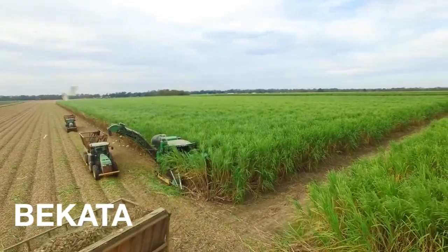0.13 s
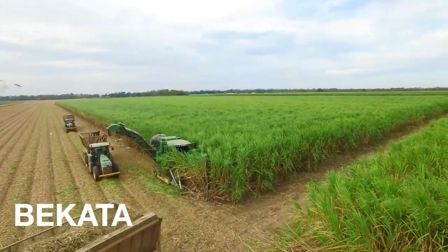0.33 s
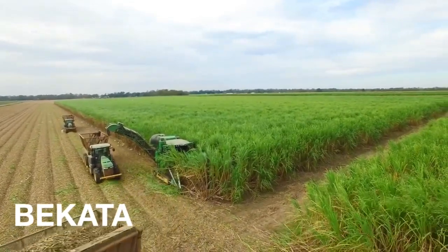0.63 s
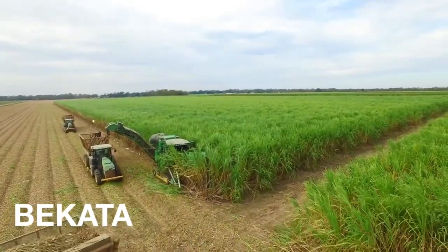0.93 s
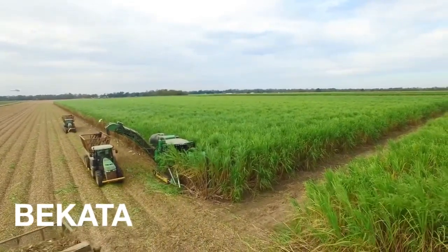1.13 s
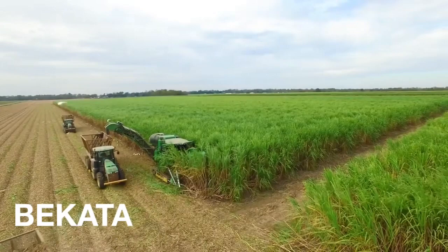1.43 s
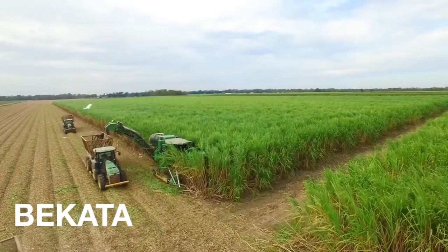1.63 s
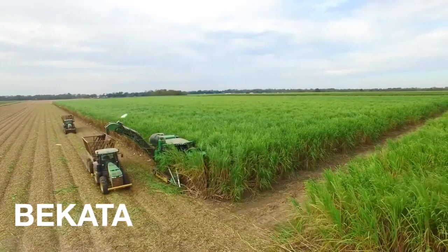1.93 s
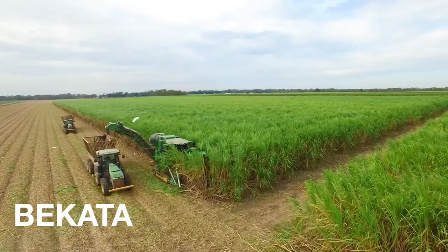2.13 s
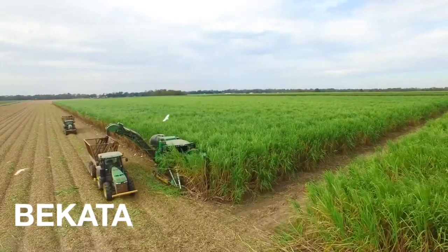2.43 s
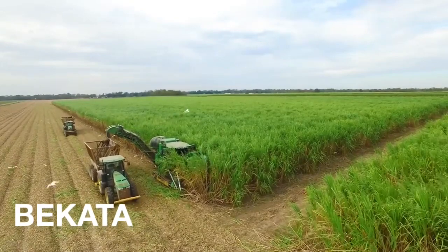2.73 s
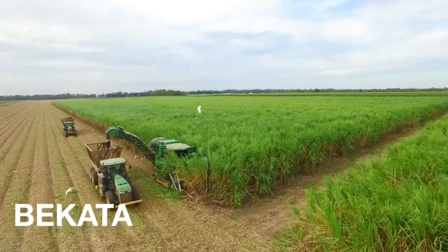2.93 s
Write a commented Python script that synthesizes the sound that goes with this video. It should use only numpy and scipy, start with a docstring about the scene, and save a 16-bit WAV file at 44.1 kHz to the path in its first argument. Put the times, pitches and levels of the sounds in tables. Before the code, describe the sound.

Harvesting machinery roars briefly up close, then rumbles in the distance under gusty wind.

```python
"""A cane harvester and tractors work in an open field on a windy day. First comes a close, bright roar of
machinery; after a quarter second the scene changes. Then distant engines rumble and hum, and wind rushes
through the cane. Fans whirr, chopped stalks rattle faintly, cutters rasp at each bite and gusts buffet the
microphone. The breeze peaks just after two seconds, then eases."""
import sys
import numpy as np
from scipy import signal
from scipy.fft import rfft, irfft, next_fast_len
from scipy.io import wavfile
from scipy.ndimage import uniform_filter1d, map_coordinates

SR = 44100
rng = np.random.default_rng(int(sys.argv[2]) if len(sys.argv) > 2 else 0)


def store_pcm(level_fs):
    """Save levels as 16-bit WAV."""
    pcm = np.round(np.clip(level_fs, -1, 1) * 32767).astype(np.int16)
    wavfile.write(sys.argv[1], SR, np.atleast_2d(pcm).T)


N = 136269
T = np.arange(N) / SR

# The breeze that rides the cane, rattle and fans. Each row: time in seconds, strength in dB.
BREEZE = [(.25, -5.5), (.45, -2), (.8, -0.3), (1.1, -0.5), (1.35, 1.5), (1.75, 1.5), (2.15, 3), (2.5, -0.4),
          (2.8, -0.5), (3.09, -0.5)]


def close_machinery(level_db=-27, tone_width_hz=24):
    """Machinery up close: a rough, broad roar with tones ringing in it."""
    # The roar's colour. Each row: frequency in Hz, relative level in dB.
    spectrum = [(21, -35), (35, -1), (113, 1.5), (150, -6.5), (188, 1), (231, -11), (283, -10.5),
                (460, -18.5), (522, -9), (938, -14), (1040, -8.5), (1210, -13.5), (1410, -11),
                (2290, -17.5), (2670, -21.5), (3440, -20), (4920, -25), (8190, -25), (15500, -38)]
    # Its ringing tones. Each row: pitch in Hz, level in dB before the gain ride.
    ringing = [(112, -35.5), (195, -36.5), (684, -41.5), (1050, -51.5), (1107, -63), (1432, -55),
               (1927, -50.5), (2062, -44.5), (2369, -46.5)]
    # The gain ride on both. Each row: time in seconds, gain in dB.
    ride = [(0, 1.5), (.06, 0), (.1, 1), (.14, 0), (.24, -0.5)]
    roar = from_db(level_db + drift(40)) * coloured(spectrum)
    tones = sum(from_db(db) * evened(resonant(hz, tone_width_hz), 0.27) for hz, db in ringing)
    return from_db(in_time(ride)) * ground_echo(roar + tones)


def distant_engines(firing_hz=110.5, firing_db=-44.5, hum_hz=444.6):
    """Far engines: exhaust rumble, a firing tone, a thin wavering hum and faint whines."""
    # The rumble's colour. Each row: frequency in Hz, relative level in dB.
    spectrum = [(25, -14), (45, -6), (90, -1.5), (160, 1.5), (265, -5.5), (310, -24), (420, -15),
                (520, -28), (900, -71)]
    # The rumble swells gently. Each row: time in seconds, level in dB.
    rumble_ride = [(.25, -38.5), (1.0, -37.5), (1.9, -35), (2.5, -37), (3.09, -36)]
    # The hum comes and goes. Each row: time in seconds, level in dB.
    hum_ride = [(.29, -67), (.38, -55.5), (.55, -51.5), (.64, -67), (.75, -53.5), (1.1, -60.5),
                (1.4, -50.5), (1.6, -56.5), (1.88, -55), (1.98, -69), (2.08, -57), (2.2, -59.5),
                (2.42, -54), (2.72, -66), (2.86, -56.5), (3.09, -58.5)]
    # Thin whines of the harvester's drives. Each row: pitch in Hz, level in dB.
    drives = [(1157, -73), (2060, -53), (2250, -57), (3712, -63), (4581, -65.5), (5855, -73), (6588, -106)]
    rumble = from_db(in_time(rumble_ride)) * evened(coloured(spectrum), 0.51)
    firing = from_db(firing_db) * rms_one(np.sin(turning(firing_hz, wander=0.0295)))
    hum = from_db(in_time(hum_ride)) * evened(resonant(hum_hz, width_hz=9), 0.048)
    whines = sum(from_db(db) * resonant(hz, width_hz=9.1) for hz, db in drives)
    return rumble + firing + hum + whines


def microphone_wind(bed_db=-34.8, knock_hz=317, even_s=0.018):
    """Wind on the microphone: steady low turbulence, a thump per gust, a knock on the hardest."""
    # The steady turbulence. Each row: frequency in Hz, relative level in dB.
    spectrum = [(20, -59), (32, -30), (45, -5), (65, 0.5), (100, -8), (150, -12), (250, -20.5), (330, -62),
                (600, -47), (1500, -88)]
    # The gusts. Each row: peak time and half length in seconds, level in dB, centre in Hz.
    gusts = [(0.497, 0.0051, -18.5, 72.6), (0.52, 0.0091, -23, 71), (0.622, 0.037, -29, 87),
             (0.816, 0.031, -26.5, 64.6), (0.901, 0.024, -24.5, 67), (1, 0.055, -30, 45.5),
             (1.079, 0.0077, -18, 70), (1.209, 0.018, -28, 88), (1.322, 0.011, -22, 45.6),
             (1.438, 0.02, -29.5, 72), (1.587, 0.054, -27.5, 59), (1.703, 0.054, -31.5, 71),
             (1.9, 0.029, -27.5, 87), (2.096, 0.032, -30, 73.4), (2.387, 0.0075, -16.5, 96),
             (2.414, 0.016, -20, 84), (2.545, 0.013, -20, 74), (2.585, 0.014, -23, 88),
             (2.641, 0.021, -22, 97), (2.9, 0.061, -29, 68)]
    strength = sum(from_db(db) * swell(at, half) for at, half, db, _ in gusts)
    thumps = sum(from_db(db) * burst(at, half, gust(hz, even_s)) for at, half, db, hz in gusts)
    knocks = from_db(-4) * strength ** 2 * evened(resonant(knock_hz, width_hz=59), even_s)
    bed = from_db(bed_db) * evened(coloured(spectrum), even_s)
    return bed + thumps + knocks


def gust(centre_hz, even_s, relative_width=0.65, low_hz=34.7, top_hz=197):
    """Dull turbulence around one low pitch, of even level."""
    def band(hz):
        peak = 1 / (1 + ((hz / centre_hz - 1) / relative_width) ** 2)
        return peak / (1 + (low_hz / hz) ** 6 + (hz / top_hz) ** 4)
    return rms_one(evened(shaped(band), even_s))


def wind_in_cane(rush_db=-41.5, hiss_db=-41, rush_follows=0.31):
    """The breeze lifts a low rush, a brighter hiss and ticking leaves; single flicks stand out."""
    # The low rush. Each row: frequency in Hz, relative level in dB.
    rush_spectrum = [(300, -12), (530, -13), (680, -5), (760, -5.5), (880, -2.5), (1100, -0.5),
                     (1350, -2.5), (1850, -6.5), (2080, -13.5), (2600, -9.5), (4000, -48), (8000, -39.5)]
    # The hiss of the leaves. Each row: frequency in Hz, relative level in dB.
    hiss_spectrum = [(700, -8.5), (1400, 1.5), (2200, 2), (3300, -3), (4200, -9.5), (4900, -12),
                     (5600, -12.5), (7400, -12.5), (8700, -17.5), (9800, -18), (10400, -27), (12200, -28),
                     (15500, -55)]
    # Leaf flicks. Each row: peak time and half length in seconds, pitch and width in Hz, level in dB.
    leaves = [(0.402, 0.002, 4040, 150, -41.5), (1.593, 0.0028, 4050, 250, -51),
              (1.73, .004, 7200, 550, -55), (2.122, 0.0037, 7400, 550, -48), (2.73, .0015, 3800, 300, -47),
              (2.743, .0016, 7900, 700, -48), (2.752, .0019, 3680, 260, -44),
              (2.962, .0019, 8200, 480, -43.5)]
    breeze_db = in_time(BREEZE)
    rush = from_db(rush_db + rush_follows * breeze_db + 0.8 * drift(32)) * coloured(rush_spectrum)
    hiss = from_db(hiss_db + breeze_db + drift(7.6)) * coloured(hiss_spectrum)
    flicks = sum(from_db(db) * burst(at, half, resonant(hz, width))
                 for at, half, hz, width, db in leaves)
    return rush + hiss + flicks + leaf_ticks(breeze_db)


def cutters(rasp_hz=2890, width_hz=990, roughness_db=3):
    """The cutters give a rough rasp that surges as they bite into thicker cane."""
    # The bites. Each row: peak time and half length in seconds, level in dB.
    bites = [(0.425, 0.028, -58), (.83, 0.034, -47), (1.196, .025, -47), (1.327, 0.015, -42),
             (1.57, 0.1, -43.5), (1.786, 0.034, -41), (2.135, 0.017, -43), (2.342, 0.025, -44.5),
             (2.9, .022, -49)]
    load = sum(from_db(db) * swell(at, half) for at, half, db in bites)
    return load * rms_one(from_db(roughness_db * drift(90)) * resonant(rasp_hz, width_hz))


def fans(width_hz=54, breeze_follows=0.74):
    """The harvester's fans whirr in narrow, wavering resonances, carried in on the breeze."""
    # The resonances. Each row: pitch in Hz, level in dB before the breeze lifts or lowers it.
    resonances = [(900, -54), (1085, -49.5), (1420, -54), (2080, -50), (2290, -55.5)]
    whirr = 0
    for hz, db in resonances:
        phase = turning(hz, wander=0.04)
        band = drift(width_hz) * np.cos(phase) + drift(width_hz) * np.sin(phase)
        whirr = whirr + from_db(db) * rms_one(band)
    return from_db(breeze_follows * in_time(BREEZE)) * whirr


def stalk_rattle(knocks_per_s=110, level_db=-48, width_hz=39, panels=60):
    """Chopped stalks knock about in the harvester, each ringing one of many panel resonances."""
    hits = rng.random(N) < knocks_per_s / SR
    knocks = hits * rng.uniform(0.45, 1, N) * from_db(in_time(BREEZE))
    panel_hit = rng.integers(0, panels, N)
    radius = np.exp(-np.pi * width_hz / SR)
    rattle = 0
    for panel, hz in enumerate(np.geomspace(830, 4700, panels)):
        ring = rung(knocks * (panel_hit == panel), hz, radius, passes=2)  # blurred by distance
        rattle = rattle + ring / (1 + (hz / 2300) ** 2)
    return from_db(level_db) * rms_one(rattle)


def leaf_ticks(breeze_db, base_ticks_per_s=550, level_db=-54, ring_cycles=33, pitches=16):
    """Leaves touch at random, more often in a stronger breeze; each touch rings briefly."""
    touches = rng.random(N) < base_ticks_per_s * from_db(breeze_db + 3 * drift(8)) / SR
    strength = from_db(-5 * np.minimum(rng.exponential(1, N), 4))
    clicks = touches * strength * rng.choice([-1, 1], N)
    pitch_hit = rng.integers(0, pitches, N)
    ticks = 0
    for pitch, hz in enumerate(np.geomspace(3000, 9300, pitches)):
        radius = from_db(-60 * hz / (ring_cycles * SR))
        ticks = ticks + hz ** -0.8 * rung(clicks * (pitch_hit == pitch), hz, radius)
    return from_db(level_db) * rms_one(ticks)


def ground_echo(x, delay_s=0.0062, wander_s=0.000633, gain=0.11):
    """The sound also arrives off the ground, by a path that wavers in the wind."""
    lag_s = delay_s + wander_s * drift(1.0)
    return x + gain * map_coordinates(x, [(T - lag_s) * SR], order=3, mode="reflect")


def from_db(db):
    """Decibels to gain."""
    return 10 ** (np.asarray(db) / 20)


def rms_one(x):
    """Scale to unit rms."""
    return x / np.sqrt(np.mean(x ** 2) + 1e-20)


def in_time(rows):
    """Join (seconds, value) rows by straight lines."""
    return np.interp(T, *np.transpose(rows))


def shaped(gain_at):
    """Noise whose amplitude spectrum is the given function of frequency; rms 1."""
    size = next_fast_len(N, True)
    hz = np.maximum(np.arange(size // 2 + 1) * SR / size, 1)
    return rms_one(irfft(rfft(rng.standard_normal(size)) * gain_at(hz), size)[:N])


def coloured(spectrum):
    """Noise drawn through (Hz, dB) points, rolled off below the first; rms 1."""
    points_hz, db = np.transpose(spectrum)

    def gain_at(hz):
        curve = from_db(np.interp(np.log(hz), np.log(points_hz), db))
        return curve / np.sqrt(1 + (points_hz[0] / hz) ** 8)
    return shaped(gain_at)


def resonant(centre_hz, width_hz):
    """A band of noise, 6 dB down at width_hz either side of its centre."""
    return shaped(lambda hz: 1 / (1 + ((hz - centre_hz) / width_hz) ** 2))


def drift(rate_hz):
    """Smooth random movement; rms 1."""
    return resonant(0, rate_hz)


def evened(x, seconds):
    """Tame the slow swings in a noise's level."""
    size = max(int(seconds * SR), 2)
    power = uniform_filter1d(uniform_filter1d(x ** 2, size), size // 2)
    return x / np.sqrt(np.abs(power) + 0.14)


def swell(at, half_length):
    """A bell-shaped rise and fall."""
    return np.exp(-0.5 * ((T - at) / half_length) ** 2)


def burst(at, half_length, noise):
    """A bell-shaped piece of a noise, with rms 1 at its top."""
    bell = swell(at, half_length)
    return bell * noise * np.sqrt(np.sum(bell ** 2) / (np.sum((bell * noise) ** 2) + 1e-20))


def turning(hz, wander):
    """Phase of a shaft whose speed wanders a little."""
    return 2 * np.pi * np.cumsum(hz * (1 + wander * drift(3.1))) / SR


def rung(clicks, hz, radius, passes=1):
    """Clicks ring a resonator; a pole radius nearer 1 rings longer."""
    section = [1, 0, -1, 1, -2 * radius * np.cos(2 * np.pi * hz / SR), radius ** 2]
    return signal.sosfilt([section] * passes, clicks + 1e-18)


def scene(roar_end_s=0.2436, fade_s=0.011):
    """The close roar gives way at once to the open field."""
    close = np.clip((roar_end_s - T) / fade_s, 0, 1)
    field = distant_engines() + ground_echo(wind_in_cane() + stalk_rattle() + cutters() + fans())
    field += microphone_wind()
    return (close * close_machinery() + (1 - close) * field)[None]


def record(dry, low_cut_hz=32, high_cut_hz=15600):
    """The deepest bass and the top are cut."""
    dry = signal.sosfilt(signal.butter(4, low_cut_hz, "high", fs=SR, output="sos"), dry)
    return signal.sosfilt(signal.ellip(10, 0.1, 80, high_cut_hz, fs=SR, output="sos"), dry)


dry = scene()
out = record(dry)
store_pcm(out)
```